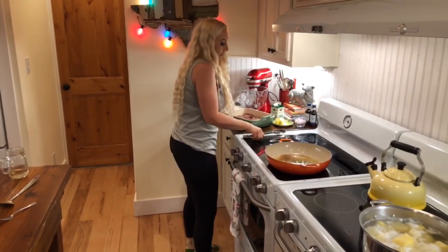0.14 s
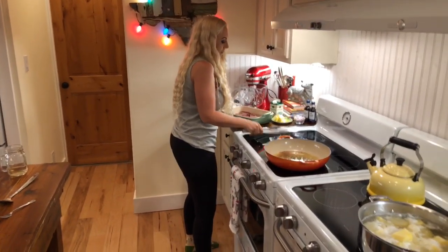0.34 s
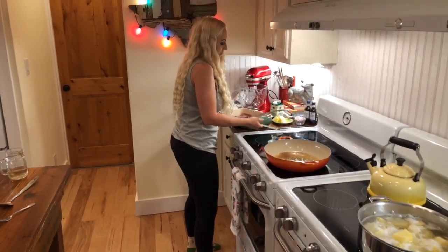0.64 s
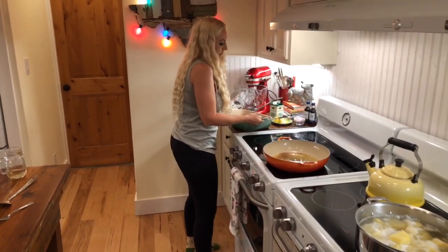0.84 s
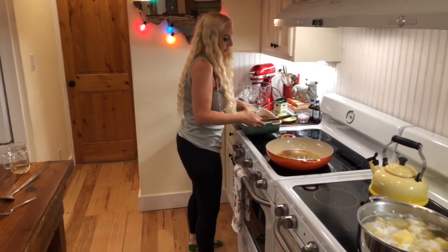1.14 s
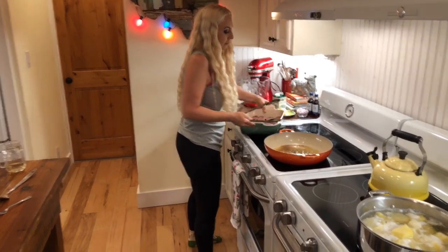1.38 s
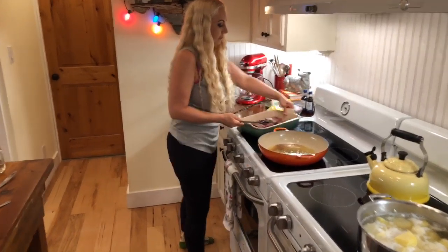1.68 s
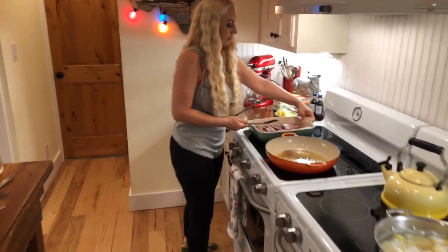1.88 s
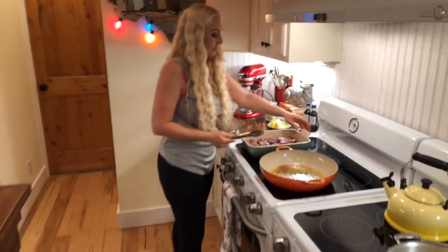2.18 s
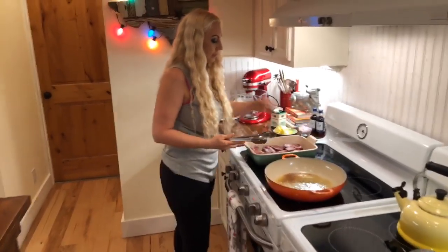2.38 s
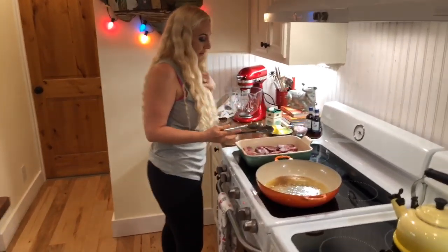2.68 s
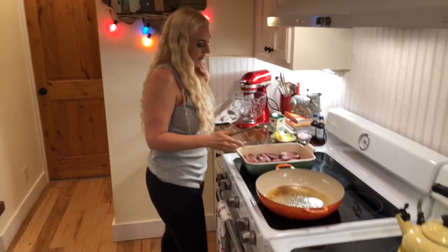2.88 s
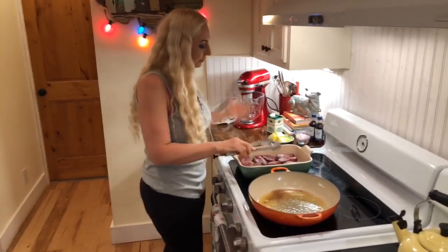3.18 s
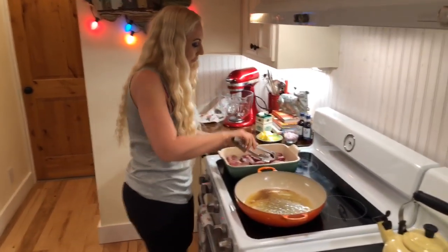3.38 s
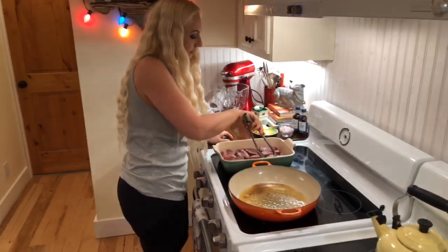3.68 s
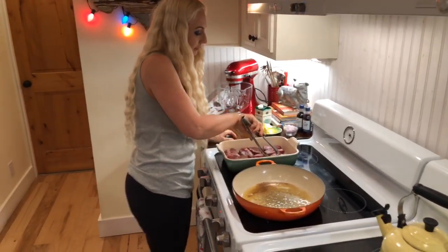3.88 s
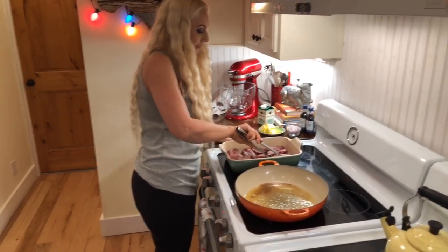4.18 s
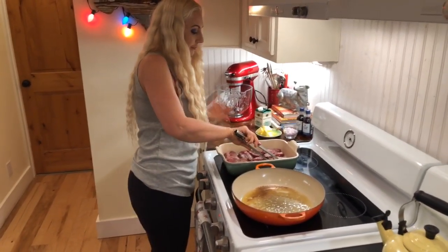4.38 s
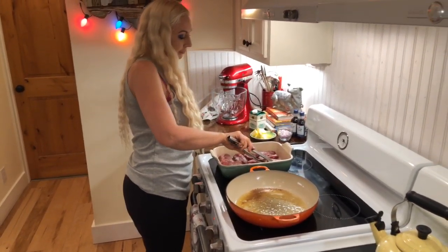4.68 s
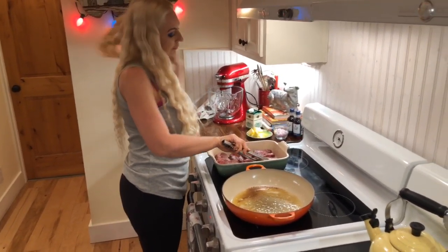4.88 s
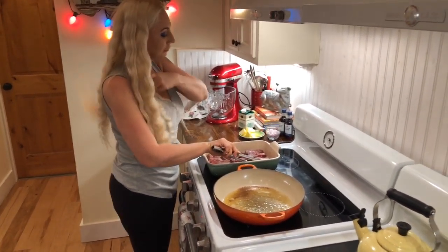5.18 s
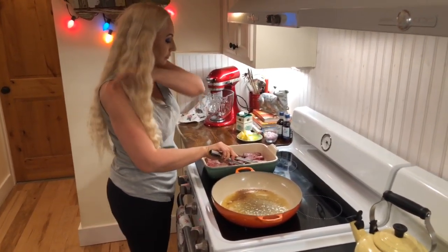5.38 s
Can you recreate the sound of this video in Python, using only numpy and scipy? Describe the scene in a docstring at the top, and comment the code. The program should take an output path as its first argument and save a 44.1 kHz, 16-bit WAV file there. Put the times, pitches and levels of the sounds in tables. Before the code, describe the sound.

A heavy stoneware dish scrapes and knocks onto a stove in a quiet kitchen, then steel tongs click and tap it.

```python
"""A stoneware dish slides off a kitchen counter and knocks on counter and glass hob: blows and grit ring its modes.
Steel tongs, also ringing modes, click shut, tap the dish and drag; their hinge squeaks in wavering overtones.
A small hard thing tinks on the counter, and soft noise grains make the faint rustle of sleeves and meat.
Decaying noise gives the room's echoes; shaped noise gives room hum, microphone hiss and a slow subsonic sway,
as from a handled, moving camera."""
import sys
import numpy as np
from scipy import signal
from scipy.io import wavfile
from scipy.ndimage import uniform_filter1d

SR = 44100
rng = np.random.default_rng(int(sys.argv[2]) if len(sys.argv) > 2 else 0)


def elevation(decibels):
    """Turn decibel levels (scalar or array-like) into linear amplitude ratios."""
    levels = np.asarray(decibels, float)
    return 10 ** (levels / 20)


def log_audio(samples):
    """Write samples as a 16-bit WAV file to the path given in sys.argv[1]."""
    # one column per channel
    frames = np.atleast_2d(samples).T
    # limit to full scale, then quantise
    limited = np.clip(frames, -1, 1)
    pcm = np.round(limited * 32767).astype(np.int16)
    wavfile.write(sys.argv[1], SR, pcm)


N = 244622   # length in samples


def rms_one(x):
    """Scale a signal so that its rms level is 1."""
    return x / np.sqrt(np.mean(x ** 2) + 1e-20)


def level_curve(rows):
    """Gain that follows a (time [s], level [dB]) curve, silent outside it."""
    times_s, levels_db = np.transpose(rows)
    return elevation(np.interp(np.arange(N) / SR, times_s, levels_db, left=-200, right=-200))


def at_hz(points_hz, values, hz):
    """Read values between points on a log-frequency axis."""
    return np.interp(np.log(hz), np.log(points_hz), values)


# edges of the half-octave bands: (frequency [Hz])
EDGES_HZ = 40 * 2 ** np.arange(0, 9.1, .5)


def bands(*signals, above_hz=0):
    """Yield each half-octave band's centre and a signal cut to it; neighbouring bands take turns with the signals."""
    for k, (low, high) in enumerate(zip(EDGES_HZ, EDGES_HZ[1:])):
        if low >= above_hz:
            sos = signal.butter(2, [low, min(high, .45 * SR)], "band", fs=SR, output="sos")
            yield np.sqrt(low * high), signal.sosfilt(sos, signals[k % len(signals)])


def spread(mid, side, alike):
    """Mix two unrelated signals into left and right; more likeness leaves less difference between them."""
    alike = np.clip(alike, 0, 1)
    return np.sqrt(1 + alike) * mid + np.sqrt(1 - alike) * side * [[1], [-1]]


def coloured(x, spectrum):
    """Weight the bands of a signal by a spectrum and scale the sum to rms 1."""
    points_hz, points_db = np.transpose(spectrum)
    # neighbouring bands are flipped so that their skirts add
    return rms_one(sum(elevation(at_hz(points_hz, points_db, hz)) * band for hz, band in bands(x, -x)))


def ring(clicks, hz, t60):
    """A mode as a two-pole resonator: a unit click starts a sine of height 1 that falls 60 dB in t60 seconds."""
    radius = elevation(-60 / (t60 * SR))
    turn = 2 * np.pi * hz / SR
    return signal.lfilter([0, np.sin(turn)], [1, -2 * radius * np.cos(turn), radius ** 2], clicks + 1e-18)


def grains(per_s, uneven_db):
    """Roughness as random clicks of uneven size and either sign."""
    sizes = elevation(uneven_db * np.minimum(rng.exponential(1, N), 4)) * rng.choice([-1, 1], N)
    return sizes * (rng.random(N) < per_s / SR)


def dying(clicks, rise_s, t60):
    """Envelope that swells quickly after each click and dies away exponentially."""
    rise = np.exp(-1 / (rise_s * SR))
    fall = elevation(-60 / (t60 * SR))
    return signal.lfilter([1 - rise], np.convolve([1, -rise], [1, -fall]), clicks + 1e-18)


def struck(blows, zones_hz, modes, ring_db, scatter_db, chatter_db, chatter_s,
           crack_db, crack_s, tick_db, rise_s, top_db):
    """A blow and its brief chatter of contacts ring the modes unevenly, with a noisy crack in the same colour."""
    blows = np.array(blows)
    at = (blows[:, 0] * SR).astype(int)
    luck = rng.normal(0, 1, (len(blows), len(modes)))   # each blow excites each mode differently
    contact = rng.standard_normal(N) / np.sqrt(chatter_s * SR / np.log(1e6))

    def train(hz, extra_db):
        """One click per blow, as strong as the blow is at this frequency."""
        zone_db = [at_hz(zones_hz, row, hz) for row in blows[:, 2:]]
        above_db = top_db * max(np.log2(hz / zones_hz[-1]), 0)   # dB per octave past the last zone
        clicks = np.zeros(N)
        clicks[at] = elevation(blows[:, 1] + zone_db + extra_db + above_db)
        return clicks

    out = 0
    for k, (hz, db, t60) in enumerate(modes):
        hit = train(hz, ring_db + db + scatter_db * luck[:, k])
        chatter = elevation(chatter_db) * contact * dying(hit, rise_s, chatter_s)
        push = hit * (-1) ** k + chatter
        near_mode = signal.butter(2, [hz / 1.3, hz * 1.3], "band", fs=SR, output="sos")
        out = out + ring(signal.sosfilt(near_mode, push), hz, t60)
    for hz, band in bands(*rng.standard_normal((2, N)), above_hz=zones_hz[0] / 2.8):
        hit = train(hz, crack_db)
        swell_s = rise_s + .5 / hz   # lows swell later
        tick = elevation(tick_db) * dying(hit, swell_s, crack_s / 4)
        out += rms_one(band) * (tick + dying(hit, swell_s, crack_s))
    return out


# the dish bumping on counter and hob, and near the end a dry tap of tongs on the dish:
# (time [s], level [dB], thump against the level [dB], contact time [ms],
# rim clack against the level before dulling [dB])
KNOCKS = [(0.097, -74.5, 10, 0.68, 0), (0.272, -63, -8.5, 0.13, 8.5), (0.327, -64, -7, 0.35, 5),
          (0.895, -60.5, -12, 1.5, 5), (1.002, -63, -7.5, 1, 4), (1.05, -66, 1.5, 1.6, 5),
          (1.133, -61.5, -26, 1.3, 6), (1.434, -63.5, 9.5, 2, 6), (1.501, -49.5, 0, 0.36, 7.5),
          (1.614, -35, -5, 0.31, 6.5), (1.675, -39, -2.5, .13, 7), (1.791, -39, -1, 0.15, 6.5),
          (2.464, -73.5, 11.5, 1.1, 3), (4.999, -59, -28, 0.053, -1.5), (5.475, -84, 21, 0.78, 3)]
# centres of body thump, ring, rim clack and sharp edge: (frequency [Hz])
KNOCK_ZONES_HZ = [200, 800, 2800, 9000]
# modes of dish and hob glass: (frequency [Hz], relative strength [dB], 60 dB decay when struck [s])
DISH_MODES = [(88.4, -2.5, 0.41), (129, -4, 0.06), (157, 8.5, 0.17), (203.6, 4, 0.069), (305, -12.5, 0.2),
              (368, -16, .05), (442, -2, 0.14), (546, -1, 0.11), (636, -5.5, 0.064), (781.6, 8.5, 0.057),
              (854, 6.5, 0.05), (1045, 6.5, 0.043), (1160, 6.5, 0.039), (1268, -2.5, 0.15), (1590, 5, 0.02),
              (1530, -7.5, 0.037), (2365, -18.5, 0.056), (2510, -33.5, 0.021), (2770, -7, 0.11),
              (3520, -10, 0.06), (3820, -7.5, .03)]


def dish_knocks():
    """The dish bumps on counter and hob, and near the end tongs tap it drily; a longer contact dulls the knock."""
    time_s, level_db, thump_db, contact_ms, clack_db = np.transpose(KNOCKS)
    cycles = np.outer(contact_ms / 1e3, KNOCK_ZONES_HZ)   # wave cycles during the contact
    dull_db = -13.5 / 2 * np.log2(1 + cycles ** 2)   # nears 13.5 dB per octave above 1 / contact time
    dull_db = dull_db - dull_db[:, 1:2]   # against the ring zone
    edge_db = clack_db - 3.5 + dull_db[:, 3]   # an instant contact has its edge 3.5 dB under the clack
    blows = np.column_stack([time_s, level_db, thump_db, 0 * time_s, clack_db + dull_db[:, 2], edge_db])
    return struck(blows, KNOCK_ZONES_HZ, DISH_MODES, ring_db=-11, scatter_db=4.5,
                  chatter_db=-3.0, chatter_s=0.0075, crack_db=-8.5, crack_s=0.086,
                  tick_db=3.0, rise_s=0.00092, top_db=-24.0)


# dish dragged over the counter: (time [s], level before a 3.5 dB cut [dB])
SLIDE = [(.14, -83), (.206, -71.5), (.28, -67), (.466, -72), (.52, -67.5), (.72, -69), (.79, -63),
         (.89, -69), (.96, -63), (1.06, -62), (1.13, -85.5), (1.3, -87.5)]
# weighting of the sliding sound: (frequency [Hz], relative level per hertz [dB])
SLIDE_COLOUR = [(88, -29), (150, -2), (367, 3.5), (524, -1.5), (832, 0.5), (941, -1), (1570, -0.5),
                (1750, -4), (6000, -30), (7800, -66), (13200, -120)]


def dish_slide():
    """The rough foot of the dish stutters over the counter and stirs its modes, which die twice as fast."""
    grit = grains(per_s=990.0, uneven_db=0.0)
    body = rms_one(sum(elevation(db) * ring(grit, hz, t60 * .5) * np.sqrt(hz) for hz, db, t60 in DISH_MODES))
    scrape = coloured(rms_one(grit) + elevation(-10.5) * body, SLIDE_COLOUR)
    return elevation(-3.5) * level_curve(SLIDE) * scrape


# centres of tap belly, tap, shank, arms and tips: (frequency [Hz])
CLICK_ZONES_HZ = [800, 1450, 3900, 5400, 10200]


def click_colours(rows):
    """A tap sounds low, arms and tips high: turn rows into (time [s], arms [dB], five zones against arms [dB])."""
    time_s, arms_db, tap_db, tips_db = np.transpose(rows)
    belly_db = tap_db - 9.5   # low end of the tap
    shank_db = -12.0 + 0 * time_s   # between tap and arms
    return np.column_stack([time_s, arms_db, belly_db, tap_db, shank_db, 0 * time_s, tips_db])


# tongs clicking and tapping: (time [s], arms level [dB], dish tap against the arms [dB],
# tips against the arms [dB])
CLICKS = [(0.249, -62.5, -27, -2.5), (0.267, -63, -14.5, -14), (0.378, -59, -8, 3.5),
          (0.399, -51.5, -12, -3.5), (0.439, -63, -31, -4), (2.263, -56.5, -27, 2.5), (2.376, -65, -20, -3),
          (2.498, -71, -10, -1.5), (3.122, -56.5, -55, -5.5), (3.302, -53.5, -46, -1.5),
          (3.388, -52.5, -34, 2.5), (3.432, -57.5, -25, -2), (3.48, -42.5, -4, -6), (3.592, -55.5, 8, -6),
          (3.809, -79, -9, -27), (3.924, -80, -6, -12), (3.987, -65, -8, -13), (4.324, -63.5, -7, -15)]
# modes of tongs and the rim they tap: (frequency [Hz], relative strength [dB], 60 dB decay when struck [s])
TONGS_MODES = [(797, 3, 0.083), (861, 10, 0.059), (1003, -8, 0.074), (1355, 0, 0.035), (1600, -18.5, 0.085),
               (2050, 3.5, 0.063), (2360, 7.5, 0.034), (3490, 0, 0.029), (3850, -19, 0.032),
               (4280, -17, 0.03), (4580, -4, 0.05), (4936, 16, 0.015), (4970, -8, 0.13), (4930, -20, 0.073),
               (5410, 2, 0.031), (5600, 2.5, 0.055), (6170, -3.5, 0.018), (6250, -16.5, 0.031),
               (6030, -6, 0.033), (7050, -21, 0.067), (7010, -8, 0.038), (7130, -1.5, 0.08),
               (8350, -3, 0.084), (9560, -16, 0.039), (9700, 0, 0.025), (10450, 0.5, 0.067),
               (11380, -1, 0.072), (12100, -8, .04), (13400, -34, .04), (15000, 4, 0.059)]


def tongs_clicks():
    """Steel arms click together or tap the dish and ring briefly."""
    return struck(click_colours(CLICKS), CLICK_ZONES_HZ, TONGS_MODES, ring_db=-7, scatter_db=4.5,
                  chatter_db=-5.0, chatter_s=0.0097, crack_db=-6.5, crack_s=0.051,
                  tick_db=9.0, rise_s=0.00078, top_db=-3.5)


# tongs dragged over the counter: (time [s], level [dB])
DRAG = [(.22, -75.5), (.26, -77), (.3, -78.5), (.385, -59), (.43, -90), (.52, -94), (.6, -96)]


def tongs_drag():
    """Dense grit stirs the upper modes of the tongs, damped by hand and counter to 0.14 of their decay."""
    grit = grains(per_s=2100.0, uneven_db=1.5)
    steel = sum(elevation(db) * ring(grit, hz, t60 * 0.14) for hz, db, t60 in TONGS_MODES if hz > 3000)
    return level_curve(DRAG) * rms_one(steel)


# hinge squeaks: (start [s], length [s], slip rate [slips per s], level [dB], fall per overtone [dB])
SQUEAKS = [(4.234, 0.057, 1720, -75.5, -4), (4.426, 0.095, 3050, -81, -10)]


def hinge_squeaks():
    """The hinge sticks and slips: a wavering, rough row of four harmonics."""
    out, t = np.zeros(N), np.arange(N) / SR
    for start, length, slips_hz, db, fall_db in SQUEAKS:
        wobble = rms_one(uniform_filter1d(rng.standard_normal(N), size=150))
        phase = 2 * np.pi * np.cumsum(slips_hz * (1 + .035 * wobble)) / SR
        swell = np.sin(np.pi * np.clip((t - start) / length, 0, 1)) ** .5
        harmonics = sum(np.sin((k + 1) * phase) * elevation(fall_db * k) for k in range(4))
        out += elevation(db) * swell * harmonics
    return out


# a small hard thing touched on the counter: (time [s], main level [dB], low tap against the main level [dB],
# top against the main level [dB])
TINKS = [(2.061, -50.5, -1.9, -13.5)]
# modes of the small hard thing: (frequency [Hz], relative strength [dB], 60 dB decay [s])
TINK_MODES = [(834, -12.5, 0.47), (1246, -5, 0.064), (2283, -15, 0.098), (2589, -8, 0.1), (4050, 0, 0.037),
              (4280, 0, 0.046), (4900, -17, 0.085), (6060, -2.5, 0.097), (6730, -25, 0.052),
              (7400, -19, 0.092)]


def counter_tink():
    """A small hard thing touches the counter and rings, in the same five zones as the tongs."""
    return struck(click_colours(TINKS), CLICK_ZONES_HZ, TINK_MODES, ring_db=-0.5, scatter_db=-0.5,
                  chatter_db=-11.0, chatter_s=0.025, crack_db=-12.0, crack_s=0.14,
                  tick_db=-12, rise_s=0.00051, top_db=2.0)


# rubbing of cloth, meat and dish: (peak time [s], rise [s], fall [s],
# band level at 5 kHz before an 8 dB cut [dB], brightness [dB per octave])
RUSTLE = [(.1, 0.0073, 0.013, -81.5, 0), (1.17, 0.012, 0.01, -78, -0.5), (1.54, 0.008, 0.18, -66.5, -4.5),
          (2.53, 0.036, 0.033, -74, 0.5), (2.9, 0.044, 0.025, -78, 3), (3.28, 0.0044, 0.057, -73, 7.5),
          (4.05, 0.088, 0.075, -83, 2.5), (4.23, .01, 0.054, -78.5, 1), (4.6, 0.024, 0.026, -81, 3.5),
          (5.3, 0.032, 0.026, -97, -4)]


def rustle():
    """Rubbing makes fine soft grains in short swells, each with its own brightness."""
    t, out = np.arange(N) / SR, 0
    swells = np.array([np.exp(-.5 * ((t - peak) / np.where(t < peak, rise, fall)) ** 2)
                       for peak, rise, fall, *_ in RUSTLE])
    level_db, bright_db = np.array(RUSTLE)[:, 3:].T
    coarse, fine = grains(per_s=4100.0, uneven_db=6.0), grains(per_s=8700.0, uneven_db=5.0)
    for hz, band in bands(coarse, fine, above_hz=800):
        band_db = level_db + bright_db * np.log2(hz / 5000) - 8
        out = out + rms_one(band) * (elevation(band_db) @ swells)
    return signal.sosfilt(signal.butter(2, 11000., fs=SR, output="sos"), out)   # soften the top


# room echoes: (frequency [Hz], 60 dB decay of the tail [s], left-right likeness [0 to 1])
KITCHEN = [(100, 0.36, 1), (307, 0.59, 0.9), (800, 0.57, 0.78), (2000, 0.45, 0.54), (5070, 0.51, 0.87),
           (9150, 0.38, 0.26), (13000, 0.31, 0.99)]


def kitchen(x, early_db=-5.0, early_s=0.1, late_db=-1.5):
    """Close echoes from counter and splashback, then a tail that dies band by band, as decaying noise."""
    t, echoes = np.arange(SR // 2 + SR // 4) / SR, 0
    room_hz, room_t60, room_alike = np.transpose(KITCHEN)
    for hz, (mid, side) in bands(*rng.standard_normal((2, 2, len(t)))):
        t60 = at_hz(room_hz, room_t60, hz)
        early = elevation(early_db - 60 * t / early_s) / np.sqrt(early_s)
        late = elevation(late_db - 60 * t / t60) / np.sqrt(t60)
        both_ears = spread(mid, side, at_hz(room_hz, room_alike, hz))
        echoes = echoes + both_ears * (early + late) * np.minimum(t / 0.0011, 1)   # fades in over 1.1 ms
    return signal.fftconvolve(x[None], echoes * np.sqrt(6 * np.log(10) / SR / 2), axes=1)[:, :N]


# colour of hum and hiss: (frequency [Hz], relative level per hertz [dB])
HUM = [(30, -20), (45, -2.5), (85, -0.5), (130, -13.5), (200, -13.5), (300, -13.5), (450, -21.5),
       (630, -14), (800, -23), (2000, -29), (4500, -35), (9000, -38.5), (13000, -41), (17000, -53.5)]
# how much both channels share: (frequency [Hz], left-right likeness [0 to 1])
LIKENESS = [(20, 1), (150, 0.6), (1000, 0.76), (6000, 0.34), (12000, 0.78)]


def hum():
    """Steady room noise and microphone hiss: coloured noise partly shared by both channels."""
    hum_hz, hum_db = np.transpose(HUM)
    alike_hz, alike = np.transpose(LIKENESS)
    noise = sum(elevation(at_hz(hum_hz, hum_db, hz)) * spread(mid, side, at_hz(alike_hz, alike, hz))
                for hz, (mid, side) in bands(*rng.standard_normal((2, 2, N))))
    return elevation(-70) * rms_one(noise)


# subsonic sway: (time [s], level before the gain is smoothed [dB])
SWAY = [(0.0, -48), (0.29, -49), (0.34, -55.5), (0.48, -39.5), (0.6, -56), (1.17, -46), (1.22, -55),
        (1.7, -43), (1.74, -58), (2.12, -49.5), (2.15, -56), (5.3, -62.5), (5.45, -55), (5.55, -65)]


def sway(low_hz=6.36, high_hz=20.4, alike=0.83):
    """Sway below hearing, as from a handled, moving camera: low-pitched noise under a smoothed level curve."""
    sos = signal.butter(3, [low_hz, high_hz], "band", fs=SR, output="sos")
    mid, side = signal.sosfilt(sos, rng.standard_normal((2, N + SR)))[:, SR:]   # skip the filter's start
    return uniform_filter1d(level_curve(SWAY), size=2000) * rms_one(spread(mid, side, alike))


def scene():
    """Everything on the counter shares the room; hum and sway lie under it."""
    dish = dish_knocks() + dish_slide()
    tongs = tongs_clicks() + tongs_drag() + hinge_squeaks()
    near = dish + tongs + counter_tink() + rustle()
    direct = near * elevation([[.2], [-.2]])   # dB: left slightly louder than right
    return direct + kitchen(near) + hum() + sway()


def top_cut(x):
    """Nothing passes above the cut-off."""
    return signal.sosfilt(signal.butter(12, 16650, fs=SR, output="sos"), x)


def record(dry):
    """A steep low-pass filter cuts the extreme treble of the finished mix."""
    low_pass = signal.cheby2(10, 60, 16700, fs=SR, output="sos")   # 60 dB down from 16.7 kHz
    mix = signal.sosfilt(low_pass, dry)
    return top_cut(mix)


dry = scene()
out = record(dry)
log_audio(out)
```